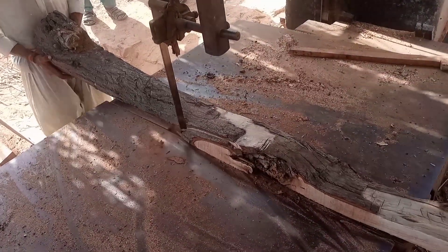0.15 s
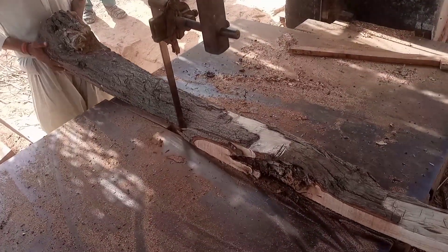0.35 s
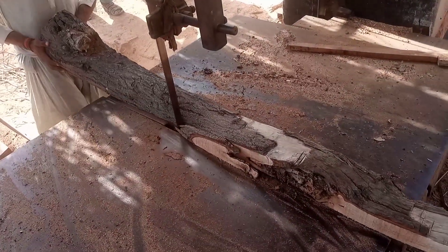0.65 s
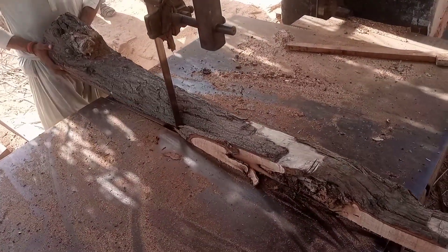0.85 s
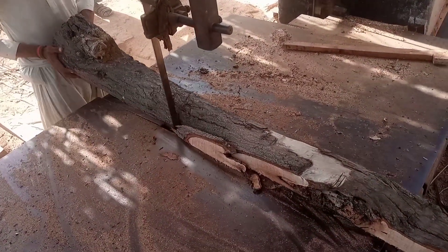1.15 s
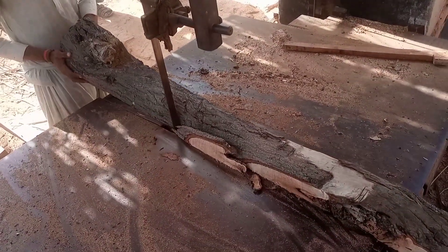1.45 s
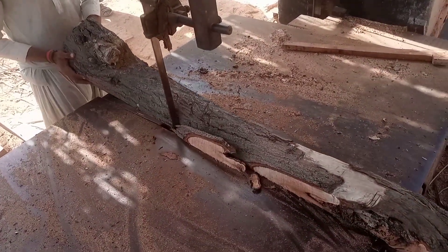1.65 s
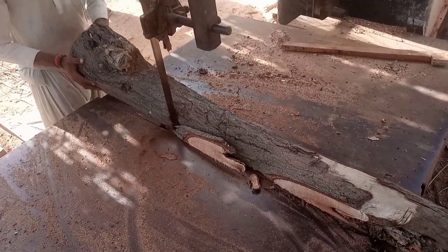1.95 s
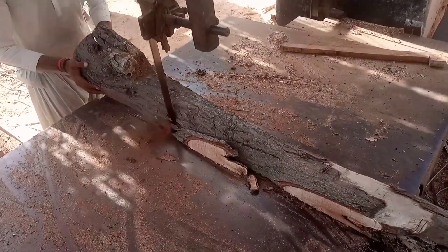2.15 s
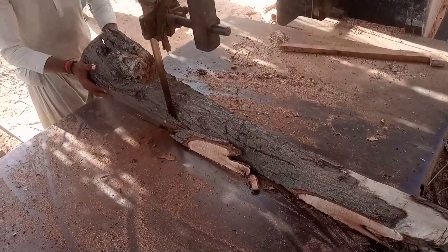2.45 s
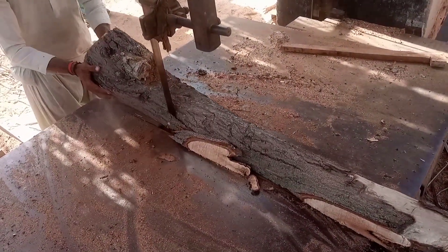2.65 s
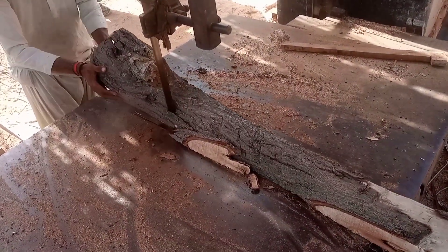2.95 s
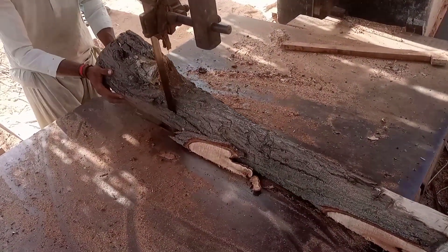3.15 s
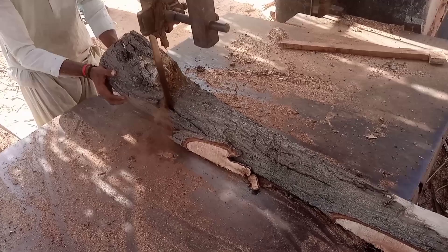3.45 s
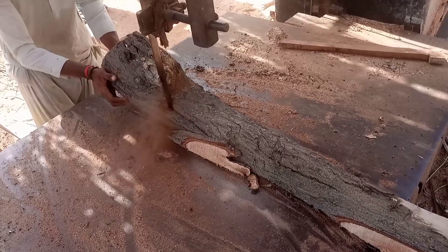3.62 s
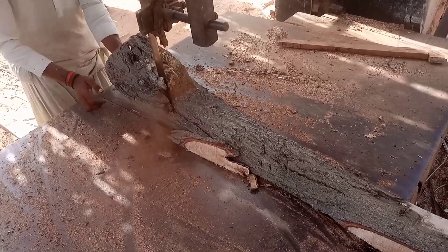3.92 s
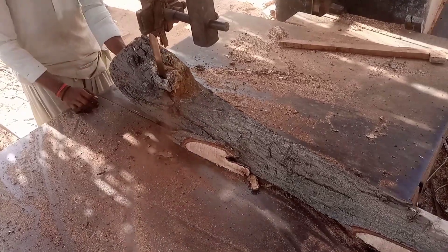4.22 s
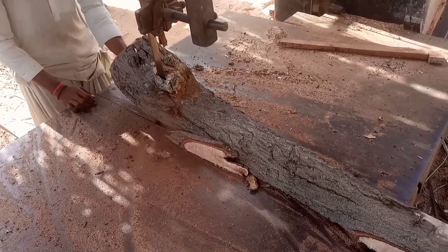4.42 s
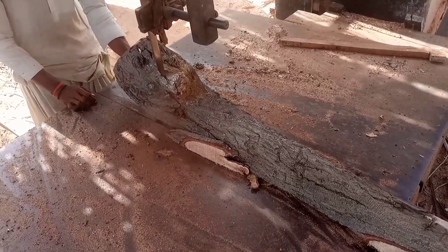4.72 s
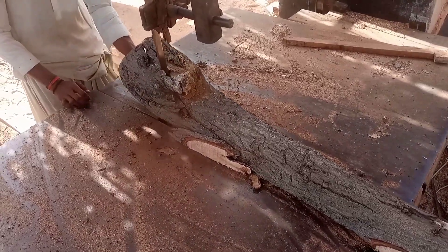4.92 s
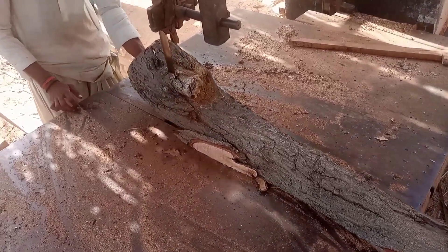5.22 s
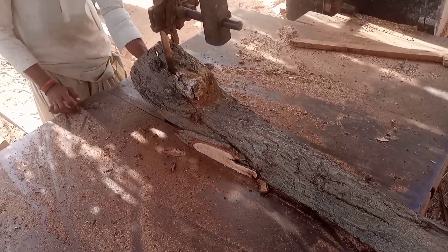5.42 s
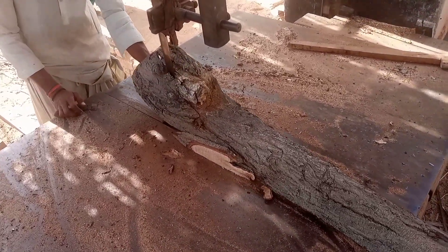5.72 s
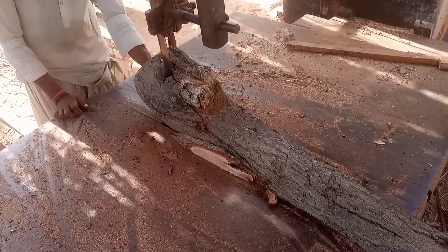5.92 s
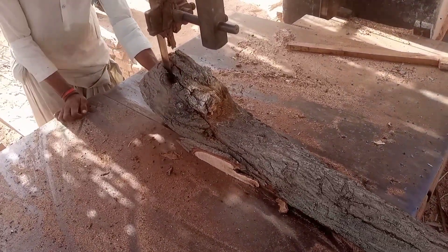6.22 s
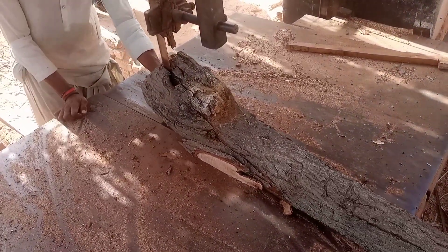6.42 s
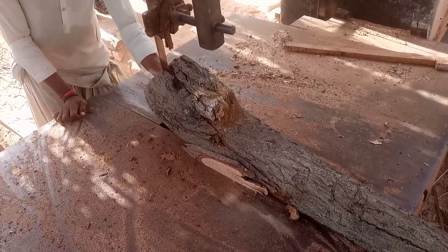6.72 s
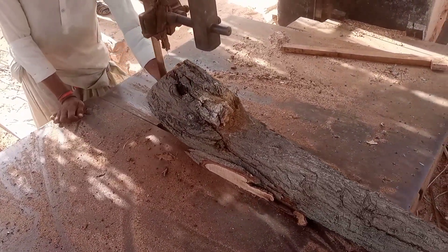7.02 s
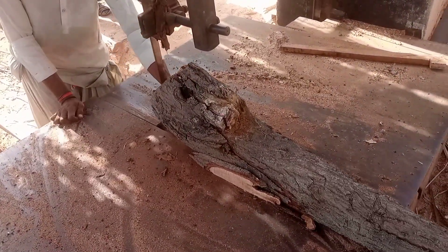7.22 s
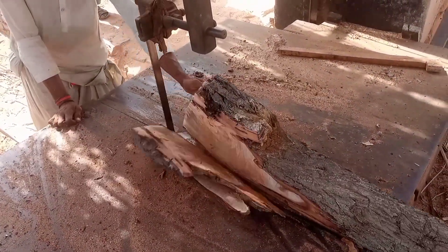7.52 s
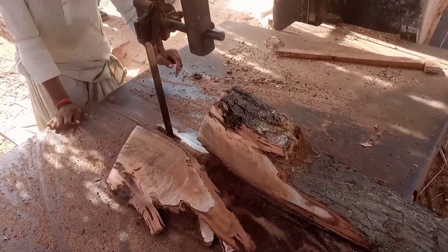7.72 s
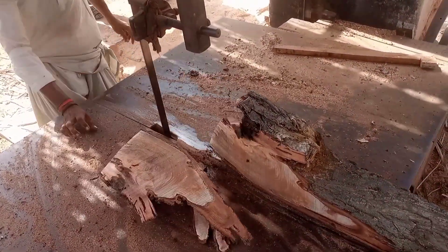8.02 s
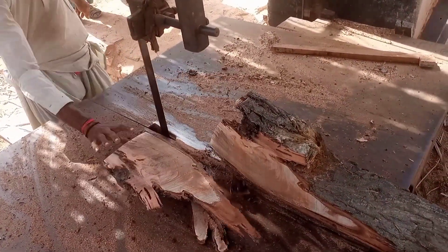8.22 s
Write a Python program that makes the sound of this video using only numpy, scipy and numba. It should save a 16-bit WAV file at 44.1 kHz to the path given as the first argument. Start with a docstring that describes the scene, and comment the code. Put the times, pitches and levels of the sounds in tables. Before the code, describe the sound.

Steady tearing hiss of a sawmill band saw through rough timber, with groaning knots, a sagging whine and a slow diesel thudding behind.

```python
"""A wide band saw rips a knotty log on a steel table in an open shed, close to a small mono microphone.
The teeth tear fibres with a bright hiss, the log crunches, and knots add a groan at their own pitch.
The band sings at multiples of the tooth rate, which sags under load, and rubs its guides all the while.
Behind it a slow single-cylinder diesel thuds over a bed of wheels, belt and shed, and loose pieces clack.
Near the end the log parts: hiss, crunch and song stop, and the rest carries on."""
import sys
import numpy as np
from scipy import signal
from scipy.fft import rfft, irfft, next_fast_len
from scipy.io import wavfile
from scipy.ndimage import uniform_filter1d
from numba import njit

SR = 44100
rng = np.random.default_rng(int(sys.argv[2]) if len(sys.argv) > 2 else 0)


def generate_wav(signal):
    """Clip the signal to [-1, 1] and save it as 16-bit WAV at the path in sys.argv[1]."""
    frames = np.transpose(np.atleast_2d(signal))
    scaled = np.clip(frames, -1, 1) * 32767
    pcm = np.round(scaled).astype(np.int16)
    wavfile.write(sys.argv[1], SR, pcm)


N = 369116  # samples, about 8.4 s


def undb(db):
    """Decibels to an amplitude factor."""
    return 10 ** (np.asarray(db) / 20)


def level(x, db):
    """Scale a sound to an RMS level in dB."""
    return x * undb(db) / np.sqrt(np.mean(x ** 2))


def curve(table):
    """Second column of a table over its first, time in seconds, joined by straight lines."""
    seconds, values = np.transpose(table)
    return np.interp(np.arange(N) / SR, seconds, values)


def swell(middle_s, length_s):
    """Half a sine wave around its middle, zero elsewhere."""
    return np.sin(np.pi * np.clip((np.arange(N) / SR - middle_s) / length_s + .5, 0, 1))


def walk(rate_hz):
    """Random levels held 1 / rate seconds and slewed twice; spread near 1."""
    hold = int(SR / rate_hz)
    steps = np.repeat(rng.standard_normal(N // 200), hold)[:N]
    return 1.3 * uniform_filter1d(uniform_filter1d(steps, hold), hold)


@njit
def svf(x, hz, width):
    """State-variable band-pass: two integrators in a loop, gain 1 at the centre."""
    y, band, low = np.empty(len(x)), 0., 0.
    g, damping = np.tan(np.pi * hz / SR), width / hz
    for i in range(len(x)):
        v = (band + g * (x[i] - low)) / (1 + g * (g + damping))
        band, low, y[i] = 2 * v - band, low + 2 * g * v, damping * v
    return y


def colour(x, shape, flicker_db, flicker_hz, tilt_db=0):
    """Shape a sound by (Hz, dB) points and a tilt per octave; quarter-octave bands flicker alone."""
    size = next_fast_len(N)
    octave = np.log2(np.maximum(np.arange(size // 2 + 1) * SR / size, 1))
    hz, db = np.transpose(shape)
    shape_db = np.interp(octave, np.log2(hz), db, -90, db[-1])
    spectrum = rfft(x, size) * undb(shape_db + tilt_db * (octave - 12))  # tilt turns about 4096 Hz
    out = np.zeros(N)
    for centre in np.arange(np.log2(hz[0]), np.log2(hz[-1]) + .25, .25):
        overlap = np.clip(1 - 4 * abs(octave - centre), 0, 1)
        out += irfft(spectrum * overlap, size)[:N] * undb(flicker_db * walk(flicker_hz))
    return out


# What band, table and microphone housing pass of a white rasp, before the tilt.
# Each row: frequency in Hz, gain in dB.
RASP_COLOUR = [(1200, -45.5), (2100, -17.5), (2950, -21.5), (3150, -6), (4200, -4.5), (6500, 0.5),
               (7450, -3), (8050, -11), (8500, -4.5), (9700, -7), (10200, -10), (13800, -21),
               (14600, -10.5), (15500, -11)]
# Flexural modes of the steel band. Each row: frequency in Hz, width in Hz, level in dB against the others.
BAND_MODES = [(2820, 50, -10), (3130, 60, -1), (3210, 90, 1), (3550, 50, -7), (3830, 60, -5),
              (3960, 50, -7), (4480, 50, -6), (4650, 50, -2), (4740, 50, -4), (5080, 60, -5),
              (5290, 50, -5), (5425, 50, 0), (5510, 50, -2), (5830, 60, -3), (6010, 70, 0), (6200, 60, -1),
              (6300, 50, -2), (6450, 60, -1), (6570, 60, 0), (6700, 60, -1), (6950, 60, -4), (7125, 60, -3),
              (7540, 70, -5), (8460, 120, -4), (9020, 80, -7), (9670, 100, -7)]
RINGING_DB = -7.5  # modes of the band against the plain rasp


def rasp(drive, tilt_db):
    """A white rasp in the colour of the band, over modes that each come and go alone."""
    modes = np.zeros(N)
    for hz, width, db in BAND_MODES:
        # dividing by the root of the width keeps wide modes from gaining power
        modes += undb(db + 3.8 * walk(12)) * svf(drive, 1. * hz, 1. * width) / np.sqrt(width)
    plain = colour(drive, RASP_COLOUR, 1.32, 14, tilt_db)
    return level(plain, 0) + level(modes, RINGING_DB)


PARTED_S = 7.39  # the last fibres give way
HISS_DB = -15  # at the full bite
# How hard the teeth bite: full for a moment, then shallow and wavering, then full from about 2 s.
# Each row: time in seconds, bite in dB against the full bite.
BITE = [(0, 1), (.15, 0.5), (.25, -7.5), (.45, -7), (.8, -7), (.92, -6.5), (1.05, -2.5), (1.17, -5),
        (1.3, -9.5), (1.65, -11), (1.9, -2.5), (2.3, 1), (2.56, 1.5), (2.73, -1.5), (2.95, 1), (3.4, -1),
        (3.6, 1.5), (4.6, 1), (5.6, -0.5), (6.05, 0), (6.26, 2.5), (6.8, -0.5), (7.37, 0)]


def cut():
    """Each tooth tears fibres with a hiss, the log crunches and the band sings until the log parts."""
    bite_db = curve(BITE) + .45 * walk(12)
    hiss = level(rasp(rng.standard_normal(N), tilt_db=1.5), HISS_DB)
    engaged = np.clip((PARTED_S - np.arange(N) / SR) / .03, 0, 1)
    return engaged * (undb(bite_db) * hiss + crunch(bite_db) + song())


# The colour of breaking wood. Each row: frequency in Hz, gain in dB.
CRUNCH_COLOUR = [(300, -7.5), (600, -5), (900, -1.5), (1250, 1), (1700, -1), (2300, 1.5), (3000, -4),
                 (4500, -17)]
# Knots change the crunch and groan at their own pitch.
# Each row: middle in seconds, length in seconds, change of crunch in dB, groan in Hz.
KNOTS = [(2.3, 0.82, 4, 1350), (3.613, 0.27, 2, 1320), (4.53, .25, 1, 1000), (5.933, .45, 1, 1240),
         (7.0, .6, -1, 1190)]
CRUNCH_DB, CRUNCH_SLOPE = -29.5, 1.09  # level at the full bite; crunch dB per bite dB
GROAN_WIDTH_HZ, GROAN_DB = 240, -2.5  # gain of the groan band over the crunch


def crunch(bite_db):
    """Wood breaks with a rough noise; each knot lifts a narrow band of it into a groan."""
    rough = rng.standard_normal(N) * undb(1.07 * walk(40))
    breaking = level(colour(rough, CRUNCH_COLOUR, 0.9, 8), CRUNCH_DB)
    crunch_db, groan = CRUNCH_SLOPE * bite_db, np.zeros(N)
    for middle, length, db, hz in KNOTS:
        knot = swell(middle, length)
        crunch_db += db * knot
        groan += knot * svf(breaking, 1. * hz, 1. * GROAN_WIDTH_HZ)
    return undb(crunch_db) * (breaking + undb(GROAN_DB) * groan)


# Rubbing on the guides, as it reaches the microphone. Each row: time in seconds, level in dB.
RUBBING = [(0, -17.5), (1.6, -17.5), (2.2, -20), (5, -22), (7.2, -21.5), (7.5, -19), (8.37, -18)]


def guides():
    """The band rubs its guide blocks: unbroken and duller than the cut."""
    rub = rng.standard_normal(N) * undb(.8 * walk(40))
    return level(rasp(rub, tilt_db=-6.0), 0) * undb(curve(RUBBING))


# The pace of the engine. Each row: time in seconds, firings per second in Hz.
FIRING_RATE = [(0.0, 10.192), (1.39, 10.438), (2.79, 10.523), (4.18, 10.191), (5.58, 9.946), (6.97, 9.83),
               (8.37, 9.837)]
# The exhaust thud and its returns from floor, wall and roof.
# Each row: delay from the firing mark in seconds, pitch in Hz, level in dB, polarity.
THUD_PATHS = [(-.0135, 130, -9, 1), (-.0025, 108, 0, 1), (.018, 185, -6, -1), (.023, 108, -4.5, 1),
              (.041, 170, -14, -1)]
# How loud the engine is at the microphone. Each row: time in seconds, thud level in dB.
EFFORT = [(0, -37), (1, -37.5), (2, -39.5), (3.2, -41), (4.2, -39), (5.4, -35.5), (6.2, -37), (7, -35.5),
          (7.6, -32.5), (8.37, -34)]
FIRST_FIRING_S = .0225


def diesel():
    """One thud per firing, a little uneven, heard along several paths."""
    cycles = np.cumsum(curve(FIRING_RATE)) / SR
    cycles -= cycles[int(FIRST_FIRING_S * SR)]
    firings = np.flatnonzero(np.diff(np.floor(cycles)))
    sizes = undb(1.2 * rng.standard_normal((len(firings), len(THUD_PATHS))))
    out = np.zeros(N)
    for (delay, hz, db, polarity), size in zip(THUD_PATHS, sizes.T):
        pulses = np.zeros(N)
        pulses[np.clip(firings + int(delay * SR), 0, N - 1)] = size
        thuds = svf(svf(pulses, 1. * hz, 1.1 * hz), 1. * hz, 1.6 * hz)
        out += polarity * undb(db) * level(thuds, 0)
    return level(out, 0) * undb(curve(EFFORT))


# The colour of wheels, belt and shed. Each row: frequency in Hz, gain in dB.
SHED_COLOUR = [(30, -34), (60, -30), (105, -10), (180, -13.5), (350, -15.5), (750, -15), (1580, -20.5),
               (2800, -58), (3600, -49)]


def shed():
    """Wheels, belt and shed blend into a low noise whose bands flicker."""
    return level(colour(rng.standard_normal(N), SHED_COLOUR, 1.4, 9.8), -34.5)


# Chips and offcuts that clack on the table.
# Each row: start in seconds, level in dB before the decay, ring in Hz, time to fall 60 dB in seconds.
CLACKS = [(.972, -12, 3400, 0.07), (1.612, -7, 2900, 0.042), (1.7, -12, 3150, 0.035),
          (6.058, -25, 1820, .15), (7.769, -19, 815, 0.03), (7.871, -13, 2800, 0.05),
          (8.0, -5, 5530, 0.039), (8.335, -20, 1950, 0.046)]


def clacks():
    """Each piece gives a short rattle around its own ring, dying away exponentially."""
    out, t = np.zeros(N), np.arange(SR // 5) / SR
    for start, db, hz, t60 in CLACKS:
        noise = rng.standard_normal(len(t))
        ring = level(svf(svf(noise, 1. * hz, .17 * hz), 1. * hz, .17 * hz), db)
        ring *= np.minimum(t / .004, 1) * np.exp(-np.log(1000) * t / t60)
        i = int(start * SR)
        out[i:i + len(t)] += ring[:N - i]
    return out


# The tooth rate sags under load. Each row: time in seconds, teeth meeting the wood per second in Hz.
TOOTH_RATE = [(1.8, 566.3), (3.1, 564.4), (3.6, 555.9), (4.2, 546.2), (4.7, 532.8), (5.2, 525.6),
              (5.5, 519.1), (6.2, 495.0), (6.6, 485.5), (7.0, 477.0), (7.2, 475.2), (7.38, 479.0)]
# A multiple of the tooth rate squeals for a while.
# Each row: middle in seconds, length in seconds, multiple, level in dB before the flutter.
SQUEALS = [(2.09, .22, 4, -24), (2.22, .09, 4, -25), (2.6, 2.2, 4, -32), (2.59, .2, 4, -26),
           (2.87, .26, 4, -25), (3.06, .15, 4, -31), (3.55, .28, 4, -32), (3.93, .14, 4, -34),
           (4.12, .2, 4, -32), (4.49, .15, 4, -31), (4.66, .2, 4, -27), (4.78, .1, 4, -32),
           (4.93, .16, 4, -33), (5.2, .3, 4, -31), (5.2, 1.4, 4, -33), (6.28, .08, 4, -35),
           (6.66, .25, 4, -40), (7.0, .22, 4, -37), (7.28, .22, 4, -33), (2.1, .2, 3, -37),
           (2.5, .25, 3, -35), (3.17, .25, 3, -38), (3.68, .35, 3, -40), (4.48, .28, 3, -37),
           (4.78, .15, 3, -40), (5.15, .3, 3, -39), (6.4, .6, 3, -41), (6.85, .3, 3, -39),
           (2.15, .3, 5, -35), (3.4, .5, 8, -29), (3.4, .8, 16, -34), (3.5, .7, 7, -33), (4.1, .6, 12, -24),
           (4.1, .4, 11, -27), (4.3, .8, 6, -32), (4.8, .4, 6, -29), (4.8, .3, 8, -32), (5.8, .4, 8, -35),
           (6.22, .25, 8, -27), (6.3, .6, 12, -25), (6.4, .4, 11, -27), (6.8, .5, 14, -31),
           (7.05, .5, 8, -32), (7.0, .4, 13, -28), (7.21, .55, 12, -23)]
SINGS_FROM_S = 1.85  # the hum between squeals starts here
HUM_DB, FOURTH_DB = -47, -43  # before wander and flutter; the fourth multiple hums louder than the others


def song():
    """The band sings at multiples of the tooth rate; uneven tooth set makes level and pitch flutter."""
    teeth = np.cumsum(curve(TOOTH_RATE)) / SR + .02 * walk(80)
    singing = np.arange(N) > SINGS_FROM_S * SR
    gains = {}
    for k in range(3, 17):
        gains[k] = undb((FOURTH_DB if k == 4 else HUM_DB) + 4 * walk(6)) * singing
    for middle, length, k, db in SQUEALS:
        gains[k] = np.hypot(gains[k], undb(db) * swell(middle, length))
    out = np.zeros(N)
    for k, gain in gains.items():
        out += np.sqrt(2) * gain * undb(3.5 * walk(120)) * np.sin(2 * np.pi * k * teeth)
    return out


def scene():
    """Saw, engine, shed and loose pieces together, the same on both channels."""
    return np.tile(cut() + guides() + diesel() + shed() + clacks(), (2, 1))


@njit
def follow(x, start, attack, release):
    """Envelope that rises faster than it falls, when attack exceeds release."""
    e, out = start, np.empty(len(x))
    for i in range(len(x)):
        e += (x[i] - e) * (attack if x[i] > e else release)
        out[i] = e
    return out


def record(dry):
    """One microphone on both channels: gain control rides the level, peaks are rounded, bass and top are cut."""
    sound = signal.sosfilt(signal.butter(3, 60, "high", fs=SR, output="sos"), dry[0])
    target_power = undb(-13.3) ** 2
    power = uniform_filter1d(sound ** 2, size=441)  # over 10 ms
    envelope = follow(power, target_power, 1 / (.052 * SR), 1 / (.1 * SR))
    sound = sound * (target_power / envelope) ** 0.19  # quiet is raised, loud is lowered
    sound = np.tanh(1.304 * sound) / 1.204
    top_cut = signal.ellip(14, .2, 90, 15500, fs=SR, output="sos")
    return np.tile(signal.sosfilt(top_cut, sound), (2, 1))


dry = scene()
out = record(dry)
generate_wav(out)
```